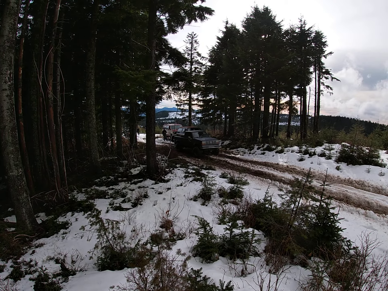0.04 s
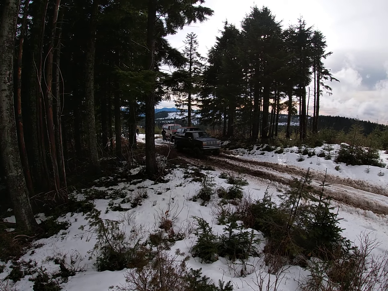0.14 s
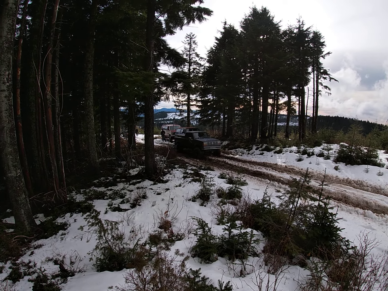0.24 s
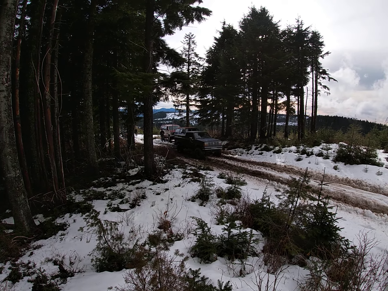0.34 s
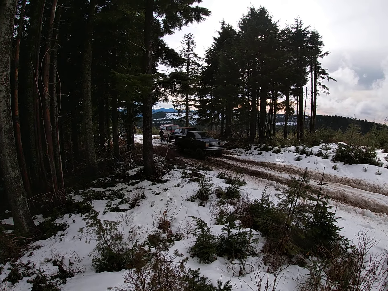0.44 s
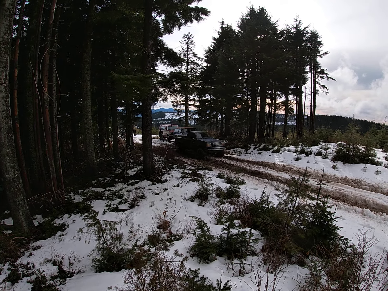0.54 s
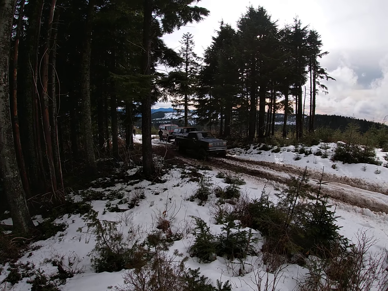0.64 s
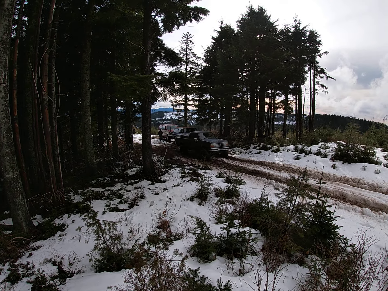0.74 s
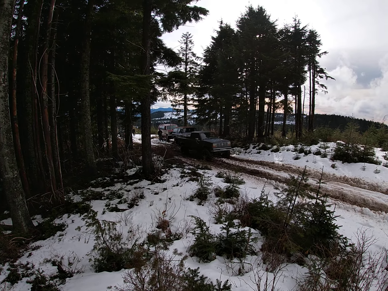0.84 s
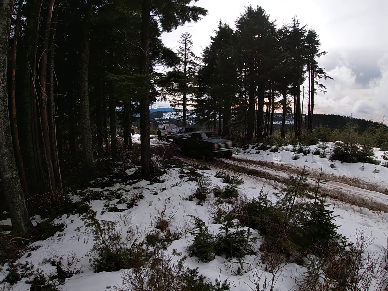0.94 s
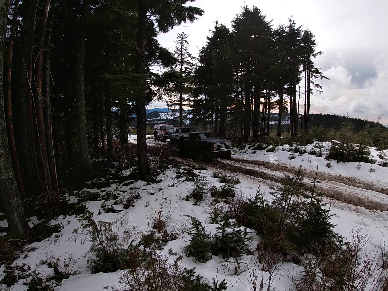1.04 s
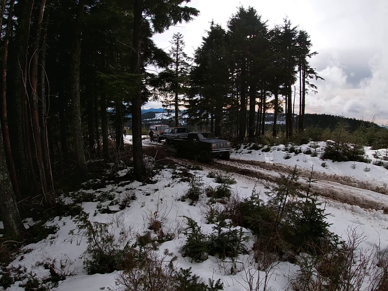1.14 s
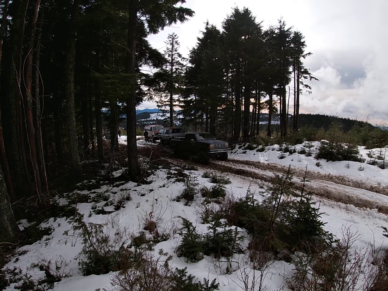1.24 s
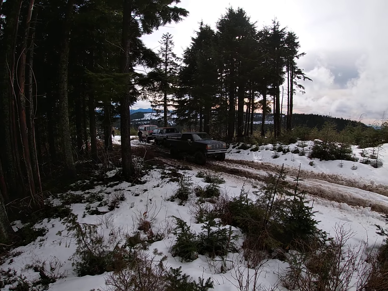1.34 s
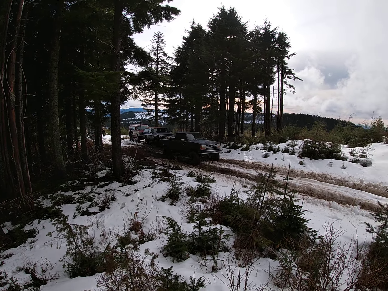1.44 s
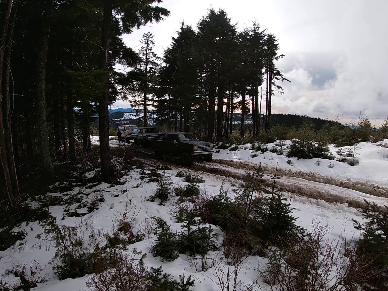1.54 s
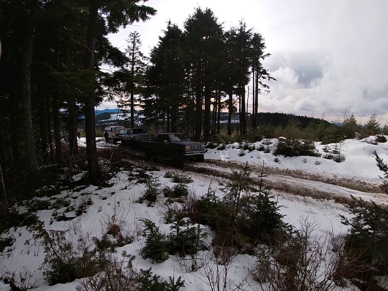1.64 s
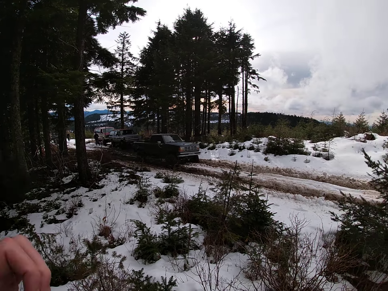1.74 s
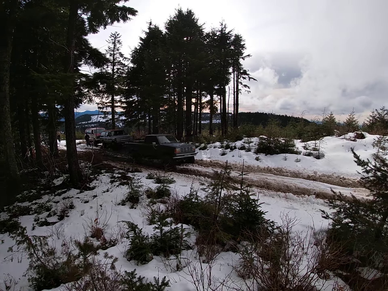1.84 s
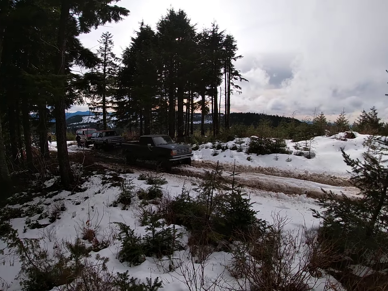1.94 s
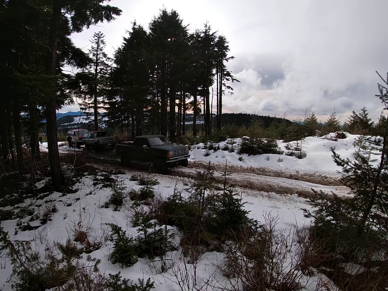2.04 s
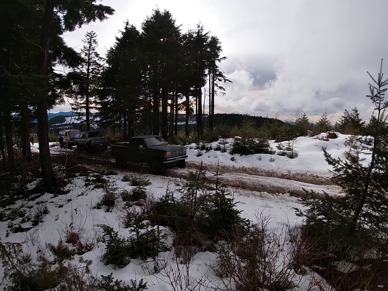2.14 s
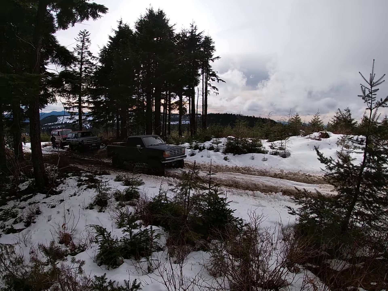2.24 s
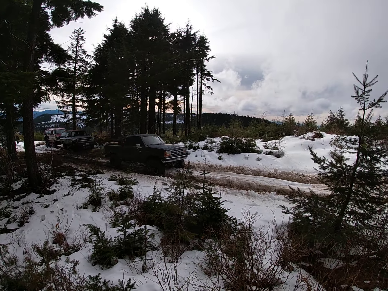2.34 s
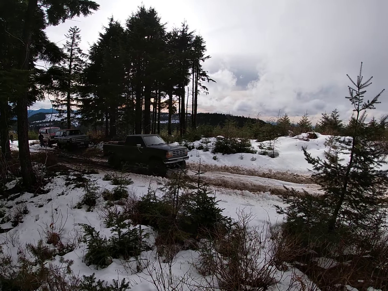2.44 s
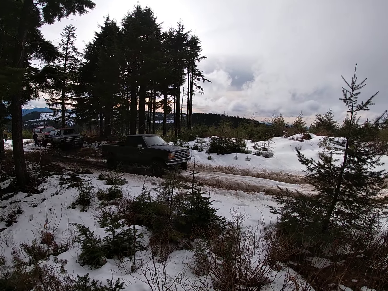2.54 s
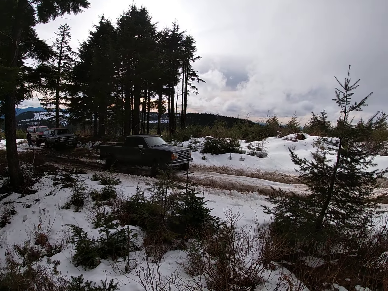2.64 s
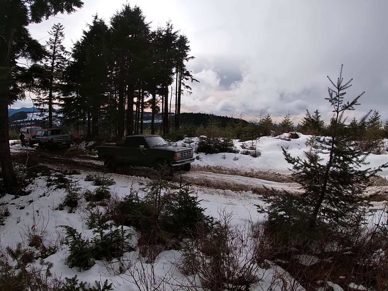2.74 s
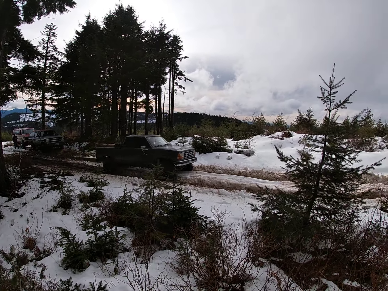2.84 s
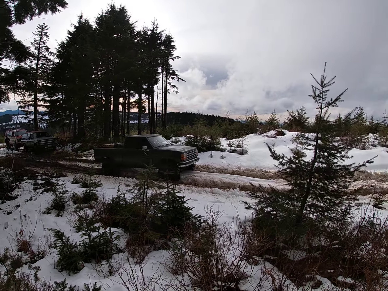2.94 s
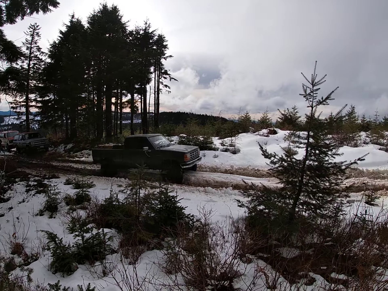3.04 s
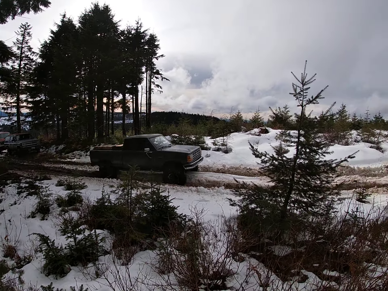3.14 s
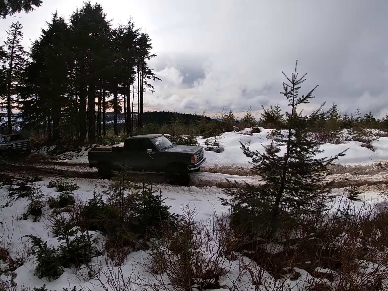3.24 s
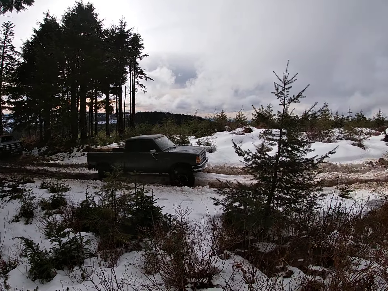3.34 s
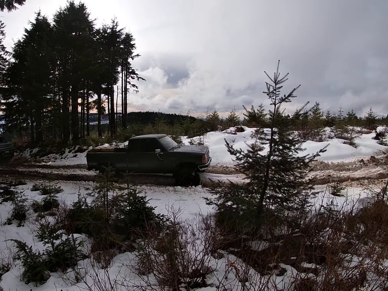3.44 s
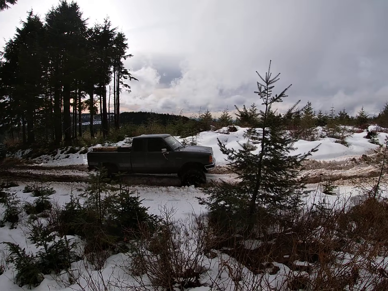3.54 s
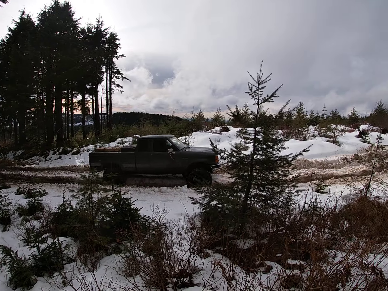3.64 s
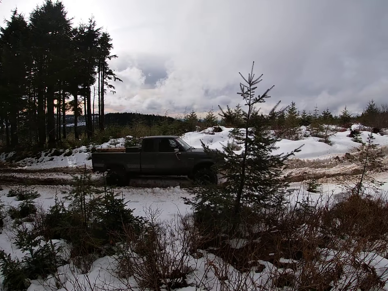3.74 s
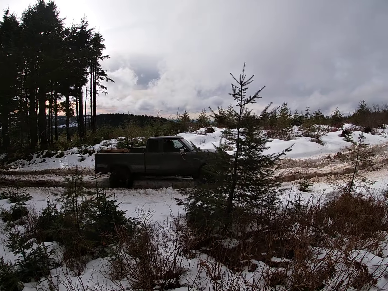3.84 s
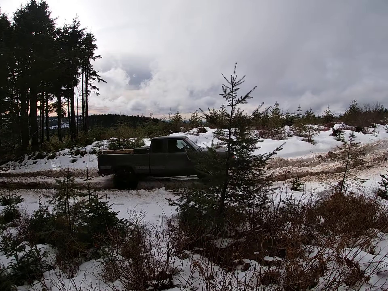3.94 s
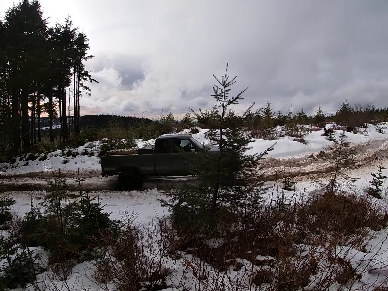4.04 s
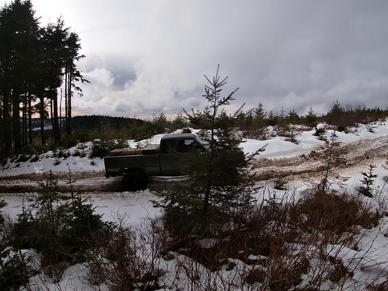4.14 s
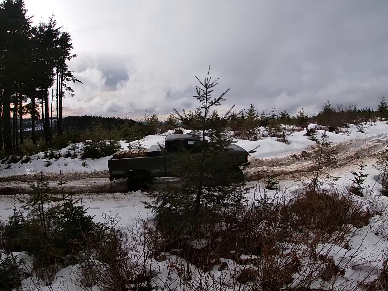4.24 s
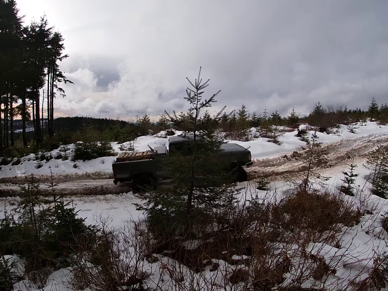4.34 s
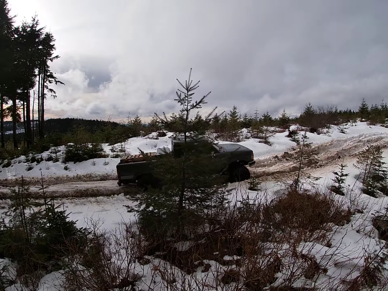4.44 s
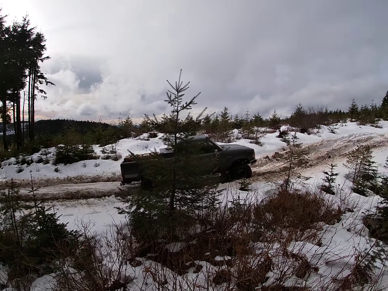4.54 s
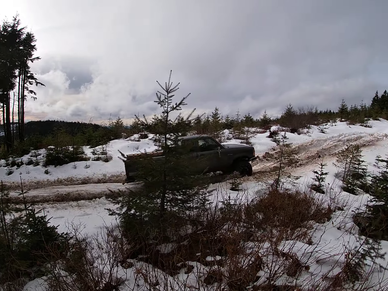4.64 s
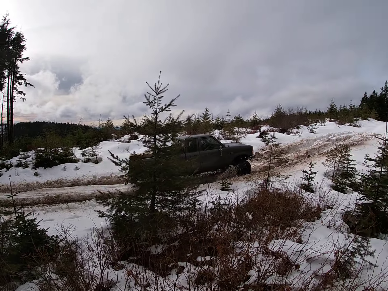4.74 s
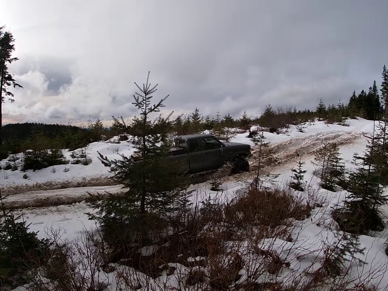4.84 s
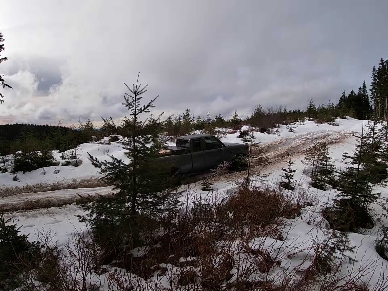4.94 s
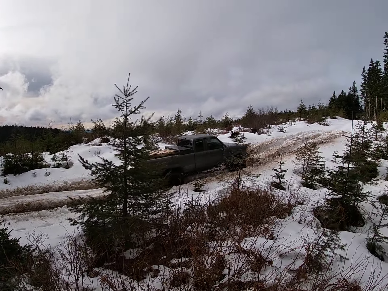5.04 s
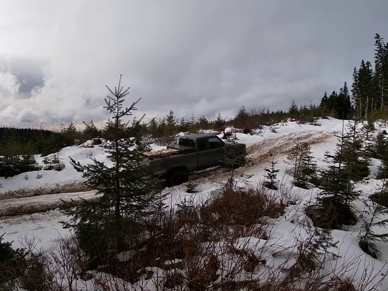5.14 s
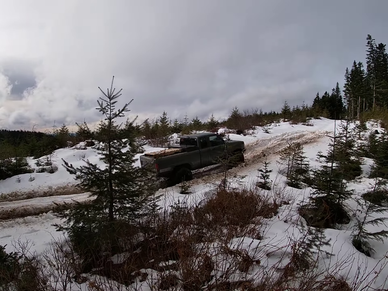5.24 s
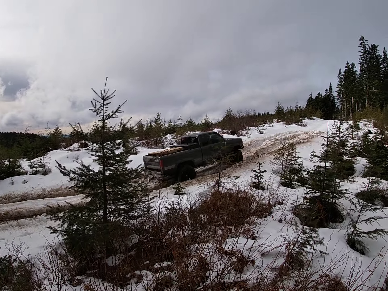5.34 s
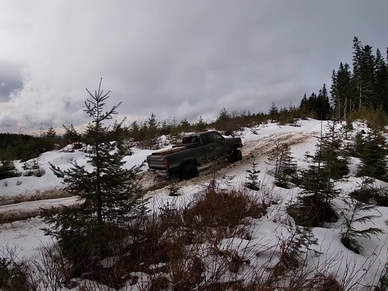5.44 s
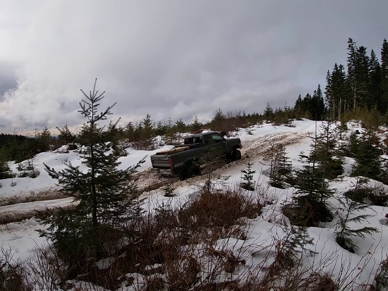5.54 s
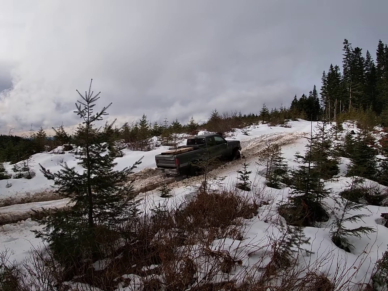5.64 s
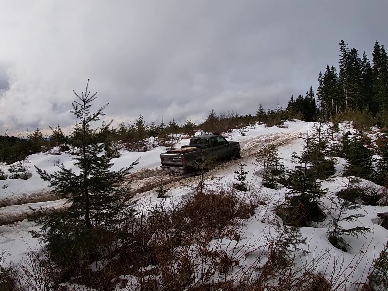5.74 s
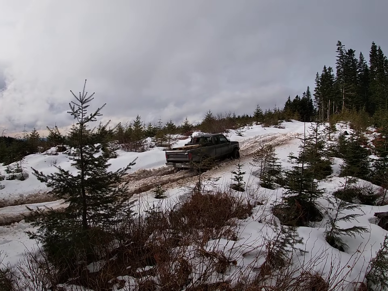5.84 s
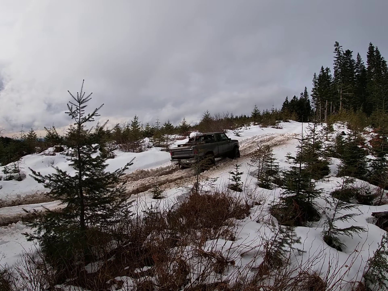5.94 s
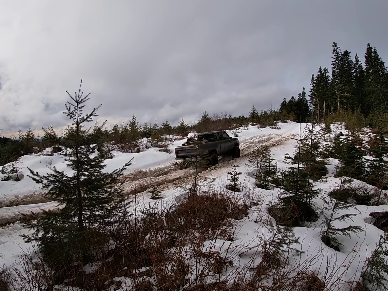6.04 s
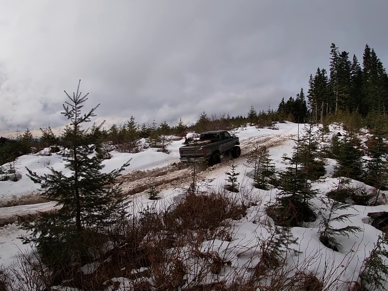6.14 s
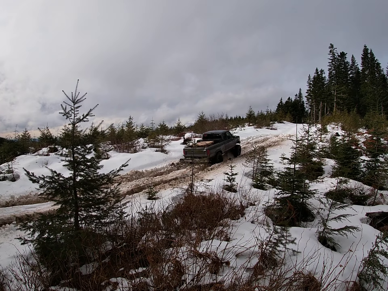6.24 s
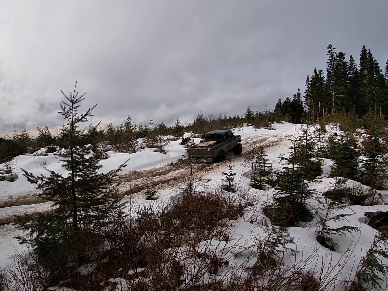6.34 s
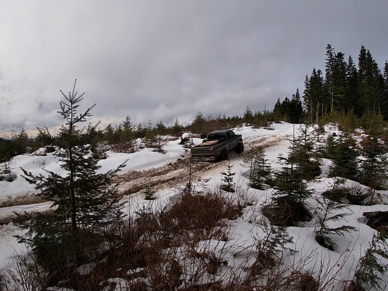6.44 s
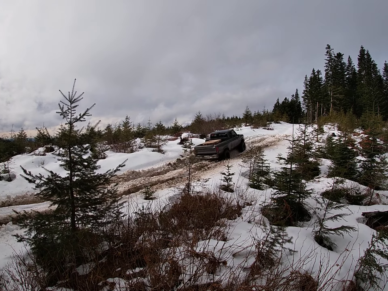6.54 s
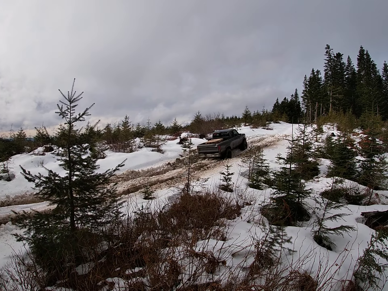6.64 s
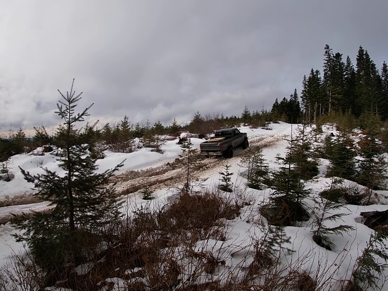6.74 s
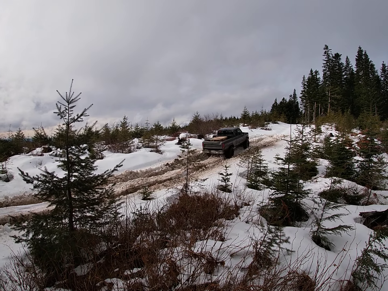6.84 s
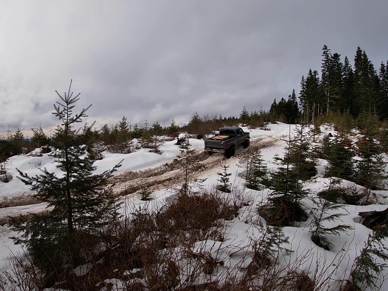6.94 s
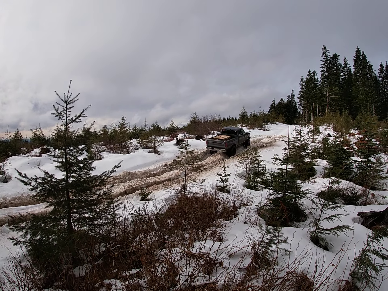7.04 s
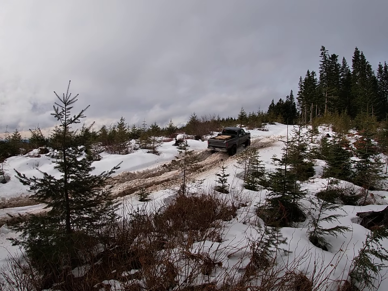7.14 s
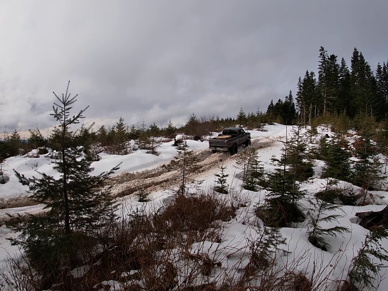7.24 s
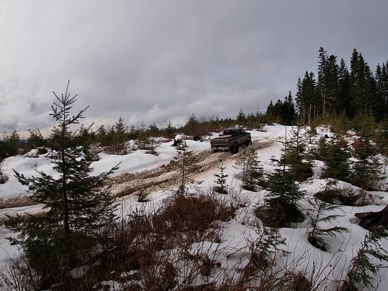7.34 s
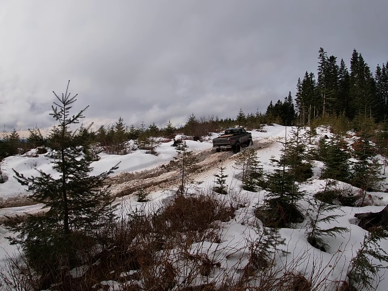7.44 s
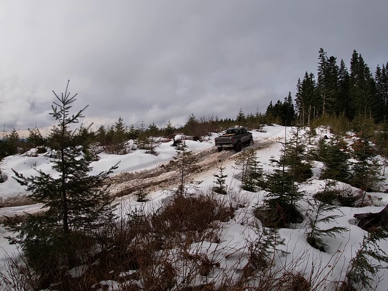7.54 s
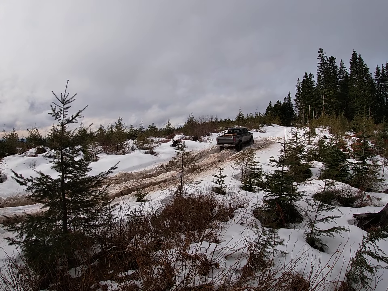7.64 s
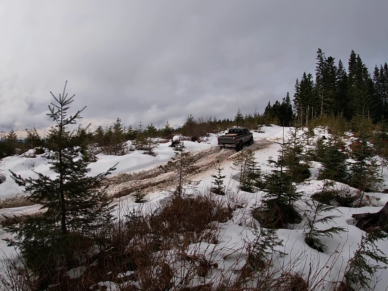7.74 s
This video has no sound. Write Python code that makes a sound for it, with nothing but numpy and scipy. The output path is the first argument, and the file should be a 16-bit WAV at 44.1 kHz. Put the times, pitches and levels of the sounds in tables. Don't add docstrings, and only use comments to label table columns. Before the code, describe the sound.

A pickup truck booms and rasps through slush on a forest track, revving and spinning its wheels, then climbs away under buffeting wind.

```python
import sys
import numpy as np
from scipy import signal
from scipy.fft import rfft, irfft, next_fast_len
from scipy.io import wavfile
from scipy.ndimage import uniform_filter1d

SR = 44100
rng = np.random.default_rng(int(sys.argv[2]) if len(sys.argv) > 2 else 0)


def nominal_scale(level):
    x = np.asarray(level, float) / 20
    return 10 ** x


def master_out(mix):
    frames = np.transpose(np.atleast_2d(mix))
    ceiling = np.clip(frames, -1, 1)
    pcm = np.round(ceiling * 32767).astype(np.int16)
    wavfile.write(sys.argv[1], SR, pcm)


N = 343539


def level(x):
    return x / np.sqrt(np.mean(x ** 2))


def shape(points, hz):
    f, db = np.transpose(points)
    octave = np.log2(np.maximum(hz, 1))
    below = np.maximum(np.log2(f[0]) - octave, 0)
    above = np.maximum(octave - np.log2(f[-1]), 0)
    return nominal_scale(np.interp(octave, np.log2(f), db) - 33 * (below + above))


def resonance(hz, rings):
    return 1 + sum(2 * nominal_scale(db) / (1 + (2 * (hz - f) / width) ** 2) for f, width, db in rings)


def colour(x, points, rings=()):
    size = next_fast_len(N)
    hz = np.arange(size // 2 + 1) * SR / size
    gain = shape(points, hz) * resonance(hz, rings)
    return level(irfft(rfft(x, size) * gain, size)[:N])


def noise():
    return rng.standard_normal(N)


def walk(rate):
    k = int(SR / rate)
    held = np.repeat(rng.standard_normal(N // k + 1), k)
    return 1.196 * uniform_filter1d(uniform_filter1d(held, k), k)[:N]


def curve(table):
    s, value = np.transpose(table)
    return np.interp(np.arange(N) / SR, s, value)


def bump(peak_s, rise_s, fall_s):
    t = np.arange(N) / SR - peak_s
    return np.cos(np.pi / 2 * np.clip(np.where(t < 0, -t / rise_s, t / fall_s), 0, 1)) ** 2


# time in seconds, firing rate in Hz.
GRIP_PACE = [(0, 80.93), (.72, 81.08), (1.11, 66.73), (1.56, 71), (2.08, 84.98), (2.23, 85.26),
             (2.42, 92.8), (2.68, 96.87), (3.14, 99.36), (3.32, 101.9), (3.75, 113.8), (4.36, 119.3),
             (4.93, 129.3), (5.46, 125.7), (6.19, 119.5), (7.12, 132.7), (7.79, 148.9)]
# peak in seconds, rise in seconds, fall in seconds, extra firing rate in Hz, throttle in dB.
ENGINE_SURGES = [(1.951, .3, .2, 0.5, 2), (2.62, 0.29, .2, .5, 0), (2.86, .2, .27, 5, -0.5),
                 (3.51, .2, .24, 9, 1), (4.07, .32, 0.3, 12, 3.5), (4.45, .2, .15, .5, 2),
                 (4.64, .29, 0.27, 18, 2.5), (5.2, 0.26, 0.24, 15, 2.5), (5.92, .46, .27, 45, 6),
                 (5.82, .13, .08, .5, 6.5), (5.96, 0.1, .07, .5, 6.5), (6.63, .43, 0.56, 36, 6.5),
                 (7.57, .43, 0.41, 23, 6.5)]


def engine():
    lead_s, hold = 0.031, 1.47
    hz, throttle_db = curve(GRIP_PACE), 0
    for s, rise, fall, extra_hz, db in ENGINE_SURGES:
        hz = hz + extra_hz * bump(s, rise, fall)
        throttle_db = throttle_db + db * np.minimum(hold * bump(s - lead_s, rise, fall), 1)
    return uniform_filter1d(hz, int(0.051 * SR)), throttle_db


# start in seconds, end in seconds.
TURNS = [
    (1.93, 2.23),
    (2.85, 2.84),
    (5.2, 5.5),
]


def turning():
    passed = [np.interp(np.arange(N) / SR, span, (0, 1)) for span in TURNS]
    return passed, -np.diff([np.ones(N), *passed, np.zeros(N)], axis=0)


# pitch in Hz, width in Hz, strength in dB.
PIPE_RESONANCES = [(513.7, 52, -4.5), (621, 46, -3), (923, 60, -0.5)]


def pipe_ring(hz):
    return resonance(hz, PIPE_RESONANCES)


# time in seconds, level in dB.
BOOM_LEVEL = [(0, -14.5), (.7, -13.5), (1.11, -14.5), (1.54, -14.5), (2.39, -15), (2.75, -14),
              (2.93, -14.5), (3.4, -12.5), (4.36, -12.5), (4.9, -12.5), (5.7, -15), (6.05, -14),
              (6.31, -17), (6.49, -17), (6.66, -21), (6.83, -16.5), (7.15, -22.5), (7.79, -18.5)]
# multiple of the firing rate, level in dB from the nose, from the front corner,
# from the flank and from the tail, dB gained per dB of throttle.
ORDER_LEVELS = [(.5, -31, -41.5, -28, -29, 0.96), (1.5, -28, -29, -34, -35.5, 0.34),
                (2, -28.5, -22.5, -25.5, -23, -0.38), (2.5, -36, -32.5, -42.5, -34.5, 0.42),
                (3, -31, -28, -29.5, -26, -0.4), (4, -38.5, -39.5, -32.5, -37.5, 1.27)]
# pitch in Hz, gain in dB.
SILENCER_GAIN = [(100, 6), (125, 0), (150, 0), (168, 4), (203, 2.5), (225, -6.5), (260, -10.5), (700, -15)]
# middle in seconds, half length in seconds, change in
# dB.
ORDER_SWELLS = [(0.117, 0.44, 2.5), (.65, 0.24, -5), (1.61, 0.32, 4.5), (2.942, 0.084, -10),
                (3.299, .15, -2.5), (4.047, .2, -1), (5.25, .2, 3.5), (6.3, .12, 2.5), (6.6, 0.23, 3),
                (7.1, 0.33, 3), (7.498, 0.34, -3.5)]


def low_orders(hz, shares, throttle_db):
    swell_db = sum(db * bump(s, half, half) for s, half, db in ORDER_SWELLS)
    levels = [curve(BOOM_LEVEL)]
    for order, *sides_db, effort in ORDER_LEVELS:
        db = np.dot(sides_db, shares) + effort * np.minimum(throttle_db, 8) + 1.5 * walk(6.3)
        if order >= 2:
            db = db + swell_db
        if order > 1:
            db = db + 20 * np.log10(shape(SILENCER_GAIN, order * hz) * pipe_ring(order * hz))
        levels.append(db)
    return levels


# pitch in Hz, gain in dB.
PIPE_GAIN = [(200, 18), (300, -12), (430, -1.5), (560, -11), (700, -5.5), (950, -7.5), (1300, -29.5)]


def exhaust(turns, hz, shares, throttle_db, hidden):
    out = 0
    order_db = low_orders(hz, shares, throttle_db)
    broken = 1 + np.clip(-14.5 - order_db[0], 0, 4) * .3
    orders = (1, .5, 1.5, 2, 2.5, 3, 4)
    wavers_db = (0.3, 0.47, 1.4, 1.4, 2.6, 0.88, 0.46)
    for order, db, waver_db in zip(orders, order_db, wavers_db):
        lag = 0.9 * (2 * order % 2)
        gain = nominal_scale(db + waver_db * broken * walk(25))
        jitter = 0.12 * order ** 1.23 * broken * walk(20)
        out = out - gain * np.sin(2 * np.pi * order * turns - lag + jitter)

    sides_db = (-46, -50, -47, -44)
    overtone_db = np.dot(sides_db, shares) + 3 * walk(4.6) + .5 * throttle_db
    for twice in (7, 9, 10, 11, 12, 13, 14, 16, 18):
        tone_hz = hz * twice / 2
        shade_db = -14 * hidden * np.clip(np.log2(hz * twice / 700), 0, .6)
        db = shade_db + overtone_db - 3.9 * (twice % 2) + 1.7 * walk(6) + 0.9 * walk(25)
        gain = nominal_scale(db) * shape(PIPE_GAIN, tone_hz) * pipe_ring(tone_hz)
        out = out - gain * np.sin(np.pi * twice * turns + .17 * twice * walk(30))
    return np.sqrt(2) * out


# pitch in Hz, level in dB per Hz.
NOSE_RASP = [(250, 7.5), (330, -27), (500, -8), (650, -7.5), (880, -2), (1150, -4), (1450, -5.5),
             (2000, -10), (3000, -19), (3400, -23)]
CORNER_RASP = [(180, -32.5), (300, -15), (376, -12.5), (403, -24), (634, -5.5), (1320, -9), (1640, -16),
               (1900, -17), (2830, -17), (4500, -36), (5850, -66.5), (9900, -120)]
FLANK_RASP = [(150, -31), (250, 5.5), (291, -13.5), (309, -14), (511, -3.5), (609, -5), (854, -9.5),
              (993, -11.5), (1210, -11), (1560, -16), (5000, -30), (6500, -61), (11000, -120)]
TAIL_RASP = [(150, -25.5), (250, 3.5), (439, -8), (565, -8.5), (744, -16.5), (944, -6), (1170, -15.5),
             (1360, -13), (1830, -15.5), (5000, -32.5), (6500, -68), (11000, -120)]
# pitch in Hz, width in Hz, strength in dB.
BAY_RESONANCES = [(1400, 220, -12.5), (830, 300, -27.5)]
ARCH_RESONANCES = [(1680, 160, -5), (680, 300, -6)]
TAIL_RESONANCES = [(570, 34, -21.5), (950, 660, -7), (1394, 94, 0), (1840, 200, -4), (2400, 410, -11),
                   (3120, 1100, -6)]


def rasp(turns, shares):
    firing = turns.astype(int)
    luck = np.clip(rng.standard_normal(N // 100), -2, 1.2)
    puff_db = 2.2 * luck[firing] - 3.5 * (firing % 2)
    puffs = nominal_scale(puff_db) * np.exp(-(turns - firing) / 0.42)
    # outline, resonances, steady flow between puffs, level in dB
    sides = ((NOSE_RASP, BAY_RESONANCES, .35, -.5), (CORNER_RASP, ARCH_RESONANCES, .8, .3),
             (FLANK_RASP, (), .8, 1.5), (TAIL_RASP, TAIL_RESONANCES, .22, 1.2))
    out = 0
    for share, (points, rings, steady, db) in zip(shares, sides):
        out = out + nominal_scale(db) * np.sqrt(share) * colour((steady + puffs) * noise(), points, rings)
    return out


# time in seconds, level in dB.
RUT_DEPTH = [(0, 2.5), (.2, 1.5), (1, 0), (1.88, 1), (1.97, -0.5), (2.36, 1), (2.81, 5), (3.2, 9),
             (3.35, 7.5), (3.5, 10.5), (5.2, 9.5), (5.4, 8.5), (5.64, 11), (6.15, 6.5), (6.9, 10),
             (7.1, 6.5), (7.4, -7), (7.79, 6)]


def ruts():
    return curve(RUT_DEPTH)


def slush(points, spatter):
    drops = (rng.random(N) < 400 / SR) * nominal_scale(2.0 * rng.exponential(size=N))
    wet = 1 + spatter * signal.lfilter([1], [1, -np.exp(-1 / (0.0041 * SR))], drops)
    return colour(wet * nominal_scale(1.0 * walk(14)) * noise(), points)


# pitch in Hz, level in dB per Hz.
FRONT_HISS = [(2500, -1), (3200, -3.5), (3500, -12.5), (3900, -1.5), (4900, -5), (5600, -7), (6500, -9),
              (7300, -17.5)]
SLUSH_HISS = [(300, 8.5), (1000, 13.5), (2000, 3.5), (3500, 0), (5000, -3), (7000, -4.5), (7800, -13),
              (8400, -28.5)]
FINE_SPRAY = [(7800, -12.5), (8600, -5.5), (9600, -0.5), (10500, -6), (11300, -15), (12500, -17.5),
              (14000, -27.5), (15200, -37)]


def tyres(passed, rut_db, throttle_db):
    near = (passed[0] + passed[1]) / 2
    front = nominal_scale(3.0) * np.sqrt(1 - near) * slush(FRONT_HISS, 0.18)
    rear = nominal_scale(7.5) * near * slush(SLUSH_HISS, 0.2)
    hiss_db = -57.5 + rut_db + 0.48 * throttle_db
    spray_db = -75.5 + 1.49 * rut_db + .2 * throttle_db
    return nominal_scale(hiss_db) * (front + rear) + nominal_scale(spray_db) * slush(FINE_SPRAY, 0.26)


# pitch in Hz, level in dB per Hz.
WIND_RUMBLE = [(14, -9), (25, 3), (50, 1.5), (100, 3), (200, -3), (300, -14.5), (500, -19.5), (900, -28.5)]
# peak of the gust in seconds, swell in dB.
GUST_SWELLS = [(0.101, 6.5), (1.15, 0.5), (3.0, 4.5), (3.65, 6.5), (4.1, 3), (5.25, 8), (5.95, 11.5),
               (6.3, 5), (6.65, 10.5), (6.97, 10.5), (7.18, 9.5), (7.45, 2.5), (7.75, 10)]


def wind():
    gust_s = 0.23
    gust_db = np.max([db * bump(s, gust_s, gust_s) for s, db in GUST_SWELLS], axis=0)
    return nominal_scale(-28 + gust_db) * colour(nominal_scale(2.5 * walk(12) + 3 * walk(40)) * noise(), WIND_RUMBLE)


# time in seconds, level in dB.
IDLER_SWELL = [(0, -1), (2.2, 0), (3.0, 1), (3.6, -1), (4.4, -6.5), (7.79, -4)]


def idler():
    db = -31 + curve(IDLER_SWELL) + 2.5 * walk(5)
    turns = np.cumsum(47.75 * (1 + .02 * walk(3))) / SR
    return np.sqrt(2) * nominal_scale(db) * np.sin(2 * np.pi * turns)


def faint_hiss():
    return nominal_scale(-75.0) * colour(noise(), [(6500, -3.5), (8000, -2.5), (10500, -1.5), (11500, -13.5)])


# start in seconds, peak in dB, pitch in Hz.
CRACKS = [(0.811, -32, 1160), (0.894, -26, 1226), (0.977, -30, 804), (1.005, -27.5, 1230),
          (1.363, -20, 1290), (1.394, -27.5, 1080), (1.449, -28, 760), (1.478, -24, 1340),
          (1.504, -30, 1200), (1.533, -26.5, 720), (1.588, -25, 1080), (1.617, -23.5, 904),
          (1.644, -34.5, 687), (1.671, -20, 1100), (1.697, -25.5, 825), (1.777, -21, 940),
          (1.829, -23, 884), (2.003, -26, 1126), (2.635, -30, 1000), (3.789, -18.5, 827), (6.466, -14, 874),
          (7.315, -28, 740)]


def pops():
    out, t = np.zeros(N), np.arange(int(.02 * SR)) / SR
    envelope = np.exp(-t / 0.0025) * np.minimum(t / 0.00022, 1)
    for s, db, hz in CRACKS:
        tones = np.sin(2 * np.pi * hz * t) + .5 * np.sin(2 * np.pi * 1.3 * hz * t)
        crack = tones + .15 * rng.standard_normal(len(t))
        out[int(s * SR):][:len(t)] += nominal_scale(db - 1.5) * crack * envelope
    return colour(out, [(600, 2.0), (2500, 4), (5000, -20)]) * np.sqrt(np.mean(out ** 2))


# start in seconds, peak in dB.
RUT_SPLATS = [
    (3.2287, -40),
    (3.6096, -38),
]


def splats():
    hits = np.zeros(N)
    for s, db in RUT_SPLATS:
        hits[int(s * SR)] = nominal_scale(db - 20.5)
    tail = signal.lfilter([1], [1, -np.exp(-1 / (.004 * SR))], hits)
    return tail * colour(noise(), [(1000, -2), (6500, -4), (8300, -31.0), (9700, -20), (12000, -30.5)])


def scene():
    hz, throttle_db = engine()
    turns = np.cumsum(hz) / SR
    passed, shares = turning()
    rut_db = ruts()
    rasp_db = -38 + 0.19 * rut_db + throttle_db
    truck = exhaust(turns, hz, shares, throttle_db, 1 - passed[1]) + nominal_scale(rasp_db) * rasp(turns, shares) + pops()
    track = tyres(passed, rut_db, throttle_db) + splats()
    return (truck + track + wind() + idler() + faint_hiss())[None]


# lower edge in Hz, level in dB below which the band is muted. The last row only ends the band before.
TREBLE_BANDS = [(11300, -88.3), (12650, -87), (13500, -84.5), (14300, -82), (15000, -78.5), (22050, 0)]


def mute_faint_treble(x):
    size, frame, offset = next_fast_len(N), 1024, 10
    spectrum, hz = rfft(x, size), np.fft.rfftfreq(size, 1 / SR)
    bands = []
    for (lo, _), (hi, _) in zip(TREBLE_BANDS, TREBLE_BANDS[1:]):
        bands.append(irfft(spectrum * (hz >= lo) * (hz < hi), size)[:N])
    power = np.add.reduceat(sum(bands) ** 2, np.arange(offset, N, frame)) / frame
    whim = rng.standard_normal(len(power))
    frame_at = np.clip(np.arange(N) - offset, 0, None)
    for band, (_, db) in zip(bands, TREBLE_BANDS):
        limit_db = db + 1.6 * (whim + .5 * rng.standard_normal(len(power)))
        faint = power < nominal_scale(limit_db) ** 2
        x = x - band * uniform_filter1d(np.repeat(1. * faint, frame)[frame_at], size=256)
    return x


def top_cut(x):
    return signal.sosfilt(signal.butter(12, 15350, fs=SR, output="sos"), x)


def record(dry):
    opening = np.minimum(np.arange(N) / (0.0015 * SR), 1)
    x = opening * np.tanh(0.55 * dry[0]) / 0.65
    return top_cut(mute_faint_treble(x)[None])


dry = scene()
out = record(dry)
master_out(out)
```